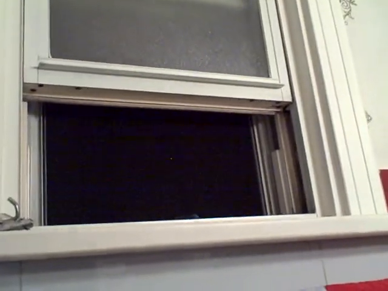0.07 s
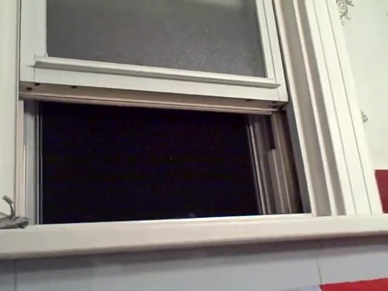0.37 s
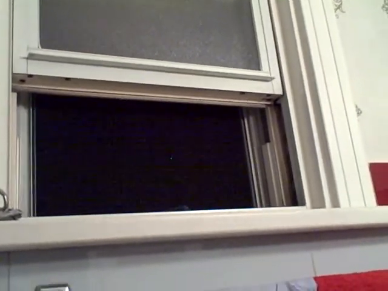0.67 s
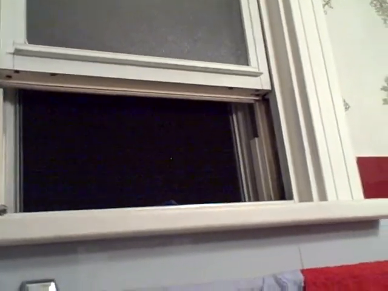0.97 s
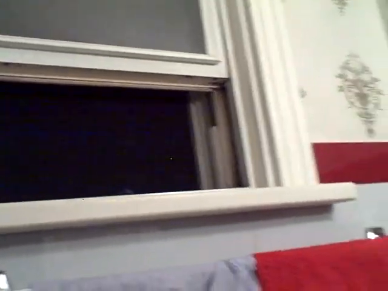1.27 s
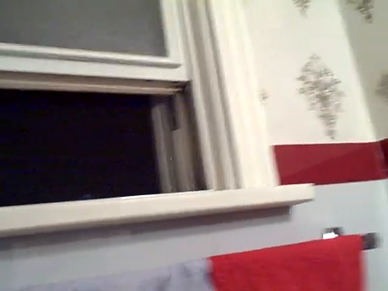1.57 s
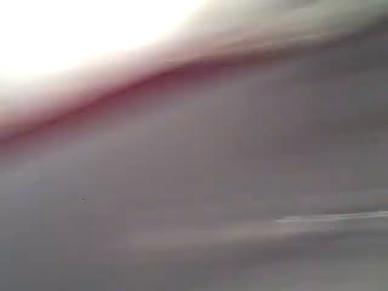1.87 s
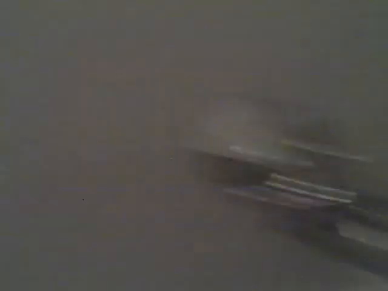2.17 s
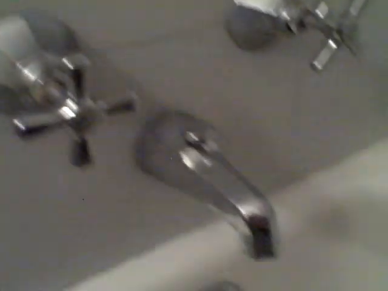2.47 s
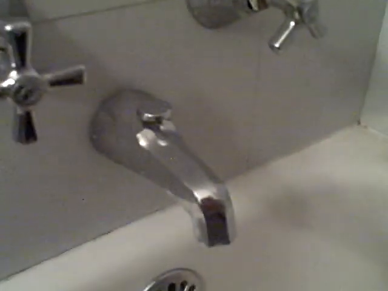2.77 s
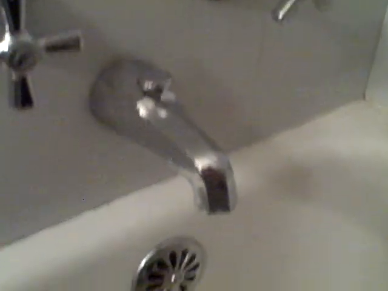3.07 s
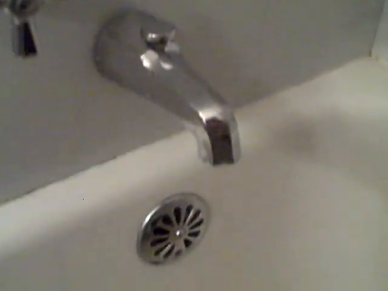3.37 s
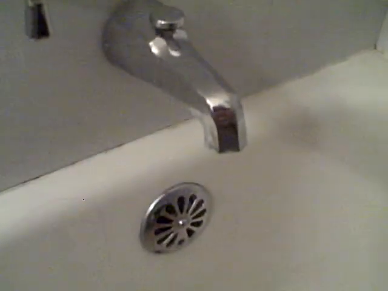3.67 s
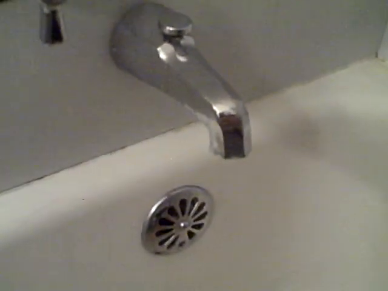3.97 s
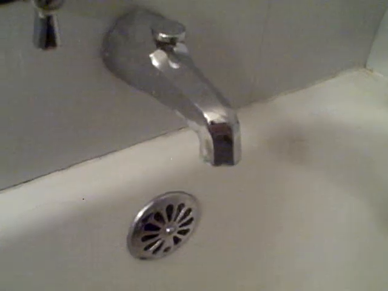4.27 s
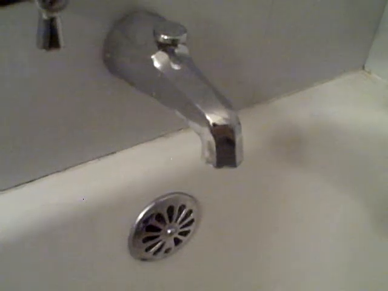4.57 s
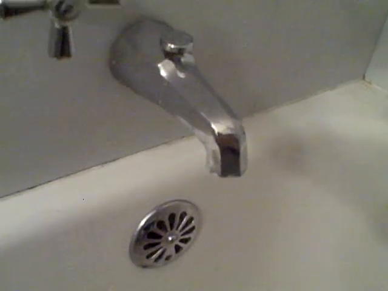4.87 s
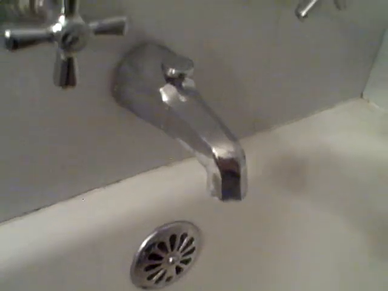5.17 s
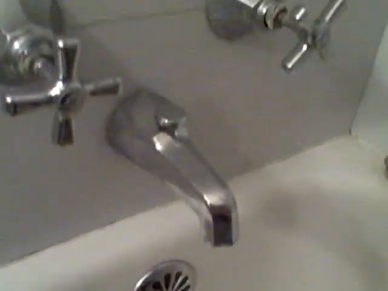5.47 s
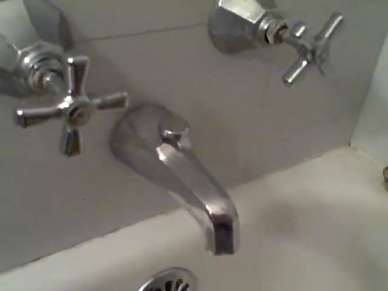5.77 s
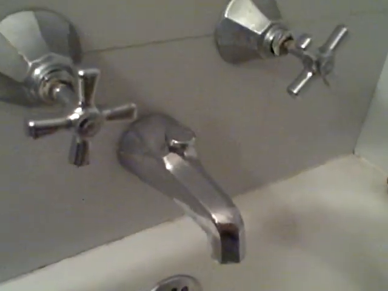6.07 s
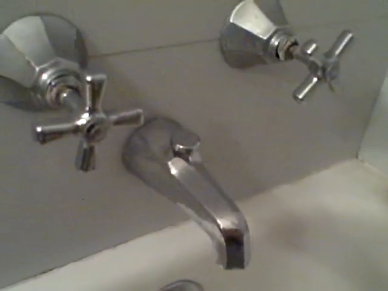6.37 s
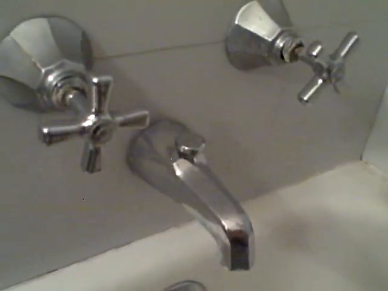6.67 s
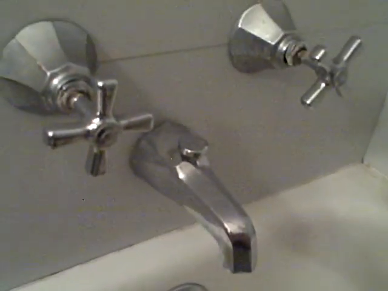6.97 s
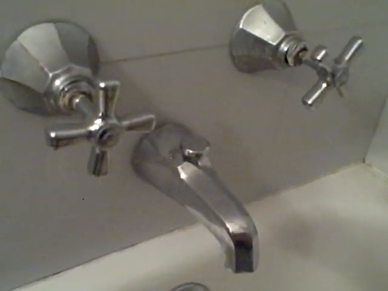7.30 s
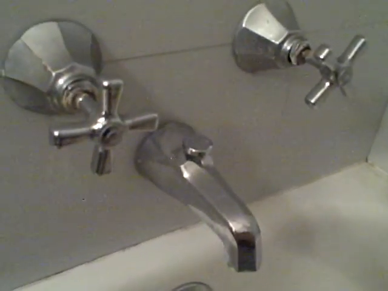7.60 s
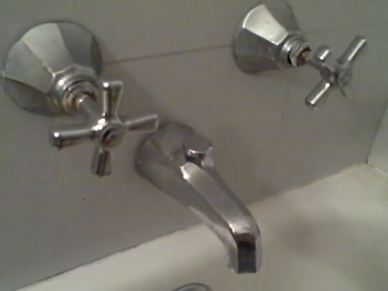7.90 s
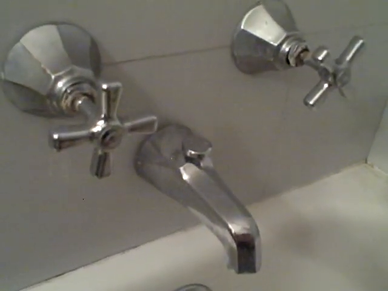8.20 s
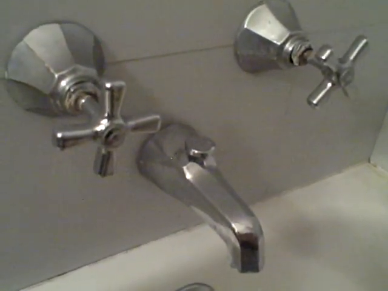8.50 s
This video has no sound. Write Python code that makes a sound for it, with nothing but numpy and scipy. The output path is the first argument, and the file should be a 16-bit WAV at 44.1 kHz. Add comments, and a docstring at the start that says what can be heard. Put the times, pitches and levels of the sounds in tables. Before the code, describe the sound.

Air rushes steadily through a bathtub faucet in a tiled bathroom, making a sputtering hiss, high breathy whistles and a hollow roar in the pipes. About two seconds in, the microphone swings from the window toward the tub with a brief low rumble and two soft swishes. The rush then sounds closer and fuller, with a fine crackle of spray and a few tiny spitting drops.

```python
"""Air rushing through a bathtub faucet

In a tiled bathroom, air in the pipes makes a hollow roar, a hiss and breathy whistles at the valve.
Leftover water makes the stream sputter, and now and then a drop spits. We listen through a small
camera that starts at the window, swings round with a buffet on its microphone and stays by the spout."""
import sys
import numpy as np
from scipy import signal
from scipy.fft import rfft, irfft, next_fast_len
from scipy.io import wavfile
from scipy.ndimage import map_coordinates

SR = 44100
rng = np.random.default_rng(int(sys.argv[2]) if len(sys.argv) > 2 else 0)


def to_wav(sig):
    """Store sig (one row per channel, or 1-D mono) as 16-bit WAV at the path in sys.argv[1].

    Samples outside -1..1 are clipped; the rate is SR.
    """
    pcm = np.clip(np.atleast_2d(sig), -1, 1) * 32767
    pcm = np.round(pcm).astype(np.int16)
    wavfile.write(sys.argv[1], SR, pcm.T)  # frames by channels


N = 376613


# notes of the air in the pipe: (pitch [Hz], width [Hz], window level [dB], tub level [dB])
PIPE_NOTES = [(914, 29, -69.5, -75.5), (972, 20, -72, -67), (1019.5, 22, -71.5, -71),
              (1108, 64, -79.5, -74), (1254, 30, -72.5, -71.5), (1303, 29, -72, -69),
              (1365, 31, -75, -72.5), (1486, 130, -79.5, -72), (1602, 37, -68, -58.5),
              (1642, 34, -66, -58.5), (1694, 73, -86, -60), (1770, 75, -79.5, -66), (1811, 31, -73, -61),
              (2483, 74, -91.5, -76), (2578, 62, -80.5, -76.5), (3840, 60, -78.5, -75.5),
              (4090, 24, -78.5, -75)]

def pipe_roar(sputter, flutter_db=1.0):
    """Rushing air keeps the pipe and spout ringing: a hollow, fluttering roar."""
    *_, roar_db, _ = balance()
    return ringing(PIPE_NOTES) * amp(roar_db + 0.29 * sputter + flutter_db * wobble(14))


# three groups of whistles: (pitch [Hz], width [Hz], level within the group [dB])
LOW_NOTES = [(4834, 26, -1.5), (5180, 70, 0), (5225, 44, -3), (5275, 44, -4), (5400, 90, -5),
             (5690, 46, 1.5), (5745, 54, -.5)]
MAIN_NOTES = [(6230, 110, -16), (6438, 42, -12), (6620, 66, -6), (6696, 36, 1.7), (6758, 58, -4)]
HIGH_NOTES = [(7060, 100, -5), (7205, 66, 0), (7290, 70, -2), (7424, 66, 1), (8572, 62, -17),
              (8780, 110, -25)]
# moments when the main whistle catches and swells: (time [s], half length [s], rise [dB])
WHISTLE_SWELLS = [(1.4, .14, 5), (3.58, .14, 5), (3.89, .06, 5), (4.08, .15, 3.5), (6.68, .07, 1),
                  (7.18, .07, 3), (7.78, .12, 1.5)]

def valve_whistles(sputter):
    """Air whistles at the valve; the low group is shielded until the camera faces the spout."""
    t = np.arange(N) / SR
    low_db, main_db, high_db, *_ = balance()
    swell_db = sum(db * np.exp(-((t - s) / half) ** 2) for s, half, db in WHISTLE_SWELLS)
    shielded_db = -5 * (1 - nearness())
    low = whistle(LOW_NOTES, low_db + shielded_db + 0.96, flutter_db=-0.05, waver_cents=1.19)
    main = whistle(MAIN_NOTES, main_db + swell_db + 2.3, flutter_db=1.0, waver_cents=1.3)
    high = whistle(HIGH_NOTES, high_db + 0.17, flutter_db=0.2, waver_cents=1.3)
    return (low + main + high) * amp(.5 * sputter)


def whistle(notes, level_db, flutter_db, waver_cents, drift_db=0.62, sag_cents_per_s=.9, in_tune_s=5):
    """One group of breathy notes that waver, flutter and sag in pitch as the pressure eases."""
    tone = unit(noise(peaks(notes)))
    cents = sag_cents_per_s * (in_tune_s - np.arange(N) / SR) + waver_cents * wobble(5)
    speed = 2 ** (cents / 1200)  # 1200 cents make an octave
    tone = map_coordinates(tone, [np.cumsum(speed)], order=3, mode="mirror")
    return tone * amp(level_db + drift_db * wobble(7) + flutter_db * wobble(30))


# tone of the hiss from two places: (frequency [Hz], level [dB])
HISS_AT_WINDOW = [(20, -62.5), (50, -77.5), (110, -84.5), (300, -75.5), (560, -86.5), (790, -84),
                  (1200, -80.5), (2100, -86), (3100, -85), (4400, -75), (6600, -75.5), (7400, -80),
                  (8100, -95), (9000, -102)]
HISS_AT_TUB = [(20, -63), (45, -78.5), (190, -77), (400, -77), (790, -81), (1200, -79), (2100, -82),
               (3500, -80), (4600, -77), (6300, -73.5), (7500, -80.5), (8000, -86.5), (8350, -90),
               (8900, -102.5)]

def jet_hiss(sputter):
    """The jet of air makes a broad hiss that sputters with the stream."""
    return window_to_tub(slope(HISS_AT_WINDOW), slope(HISS_AT_TUB)) * amp(.7 * sputter)


# low notes of the room and tub: (pitch [Hz], width [Hz], window level [dB], tub level [dB])
ROOM_NOTES = [(78.6, 9.7, -70, -62), (91, 12, -78, -70), (132, 30, -83, -71.5), (154.3, 15, -72.5, -73.5),
              (239.8, 14, -79, -67), (268, 7.1, -69.5, -67), (327, 17, -87, -69), (447.2, 12, -75, -63),
              (436, 24, -86, -69), (504, 21, -64.5, -65), (505, 14, -72.5, -64), (541, 17.4, -61, -59),
              (577.6, 13.8, -66.5, -61), (622, 17, -73.5, -68), (638, 18, -79.5, -74.5),
              (700, 40, -76.5, -75.5)]

def room_boom():
    """Sound bouncing to and fro in the room and the tub builds into a low boom."""
    *_, boom_db = balance()
    return amp(boom_db) * ringing(ROOM_NOTES)


# drops spitting in the spout: (time [s], level [dB])
DROPS = [(3.229, -30), (3.611, -32), (4.2483, -28.5), (5.138, -30), (5.392, -33), (7.195, -29.5),
         (7.555, -26)]

def spitting_drops(fade_s=0.011):
    """Each drop bursts in the stream with a tiny bright tick."""
    t = np.arange(N) / SR
    bursts = sum(amp(db - 60 * np.abs(t - s) / fade_s) * (t >= s) for s, db in DROPS)
    bright = slope([(500, -17), (2500, -2.0), (4000, 0), (7300, 1.5), (8200, -13), (9500, -25.0)])
    return bursts * unit(noise(bright))


def spray(drops_per_s=260, level_db=-49):
    """Tiny droplets torn off by the jet make a fine crackle, heard only near the spout."""
    drops = (rng.random(N) < drops_per_s / SR) * rng.exponential(1, N)
    bright = slope([(600, -21), (2200, -1), (4000, -2.5), (7000, 4.0), (8200, -2.5), (9000, -26)])
    return unit(filtered(drops, bright)) * amp(level_db) * nearness()


# tone of the air pushing on the microphone: (frequency [Hz], relative level [dB])
BUFFET_TONE = [(8, -1), (20, 10), (40, 1.5), (75, -5), (130, -20.5), (250, -40), (600, -58), (2000, -91)]
# swishes of the swing: (time [s], half length [s], level [dB], centre [Hz], width [Hz])
SWISHES = [(1.905, 0.074, -40.5, 5000, 1700), (2.252, .025, -35.5, 3180, 4000)]

def camera_swing(start_s=1.68, fade_in_s=.06, peak_s=1.963, peak_db=-26, flap_db=-6):
    """The swing buffets the microphone: a rumble, a higher flap at its peak and two soft swishes."""
    t = np.arange(N) / SR
    below_peak_db = np.maximum(41 * (peak_s - t), 57 * (t - peak_s))  # rise and fall in dB a second
    push = amp(peak_db - below_peak_db) * np.clip((t - start_s) / fade_in_s, 0, 1)
    buffet = push * unit(noise(slope(BUFFET_TONE)))
    flap = amp(flap_db) * push ** 2 / push.max() * unit(noise(peaks([(70, 59, 0)])))
    swishes = np.zeros(N)
    for s, half, db, hz, width in SWISHES:
        swell = amp(db) * np.exp(-((t - s) / half) ** 2)
        swishes += swell * unit(noise(peaks([(hz, width, 0)])))
    return buffet + flap + swishes


def tile_echoes(x, echo_db, near_change_db, fade_s=.24, above_hz=1700):
    """Tiles echo the treble; the pattern shifts as the camera moves, and weakens near the spout."""
    # 4.5 new echo patterns on the way to the tub, and .55 a second as the hand drifts
    travel = 4.5 * nearness() + .55 * np.arange(N) / SR
    t = np.arange(SR // 4) / SR
    echoes = np.zeros(N)
    for step in range(int(travel.max()) + 2):
        tail = rng.standard_normal(len(t)) * amp(-60 * t / fade_s)
        presence = np.cos(np.pi / 2 * np.minimum(np.abs(travel - step), 1))
        echoes += presence * signal.oaconvolve(x, tail / np.linalg.norm(tail))[:N]
    echoes = filtered(echoes, lambda hz: hz ** 2 / (hz ** 2 + above_hz ** 2))
    share = amp(echo_db + near_change_db * nearness())
    return (x + share * echoes) / np.sqrt(1 + share ** 2)


# relative levels at the window, beside the handle, low over the spout and up by both handles:
# (arrives [s], leaves [s], low whistle [dB], main whistle [dB], high whistle [dB], roar [dB], boom [dB])
RESTING_PLACES = [(0, 2, -46, -44.5, -47.5, -.5, .5), (2.25, 3.05, -34, -36.8, -39, 0.7, -0.2),
                  (3.35, 5.14, -37.5, -36.5, -37, 1, 0.36), (5.35, 8.54, -37.5, -37.5, -41, 0.2, -.2)]

def balance():
    """Sound spreads unevenly, so the five levels glide to a new mix at each place the camera rests."""
    return curves([(s, *levels) for arrives, leaves, *levels in RESTING_PLACES for s in (arrives, leaves)])


# the camera's path: (time [s], nearness to the tub [0-1])
CAMERA_PATH = [(1.2, 0), (2.03, 0.12), (2.25, 0.51), (2.9, 0.83), (3.3, 1), (8.54, 0.83)]

def nearness():
    """How far the camera has come: 0 at the window, 1 at the tub."""
    return curves(CAMERA_PATH)[0]


def window_to_tub(at_window, at_tub):
    """Noise whose tone passes from the window's to the tub's as the camera comes near."""
    near = nearness()
    return np.sqrt(1 - near) * noise(at_window) + np.sqrt(near) * noise(at_tub)


def ringing(notes):
    """The air stream keeps a set of notes ringing."""
    at_window = peaks([(hz, width, db) for hz, width, db, _ in notes])
    at_tub = peaks([(hz, width, db) for hz, width, _, db in notes])
    return window_to_tub(at_window, at_tub)


def noise(shape):
    """Swirling air: white noise with a power of 1 per Hz, put through a tone shape."""
    return filtered(rng.standard_normal(N) * np.sqrt(SR / 2), shape)


def filtered(x, shape):
    """Turn each frequency of x up or down by a tone shape."""
    size = next_fast_len(N + SR // 2)
    return irfft(rfft(x, size) * shape(np.fft.rfftfreq(size, 1 / SR)), size)[:N]


def slope(points):
    """A tone shape that joins (frequency [Hz], level [dB]) points."""
    freqs, db = np.transpose(points)
    return lambda hz: amp(np.interp(np.log(hz + 1), np.log(freqs), db))


def peaks(notes):
    """A tone shape with a steep peak at each (pitch [Hz], width [Hz], level [dB])."""
    return lambda hz: np.sqrt(sum(amp(db) ** 2 / (1 + ((hz - pitch) / (0.68 * width)) ** 2) ** 2
                                  for pitch, width, db in notes))


def curves(rows):
    """Join the rows over time: one curve for each column after the first."""
    times, *columns = np.transpose(rows)
    return [np.interp(np.arange(N) / SR, times, column) for column in columns]


def wobble(rate):
    """A smooth curve through `rate` random points a second."""
    return map_coordinates(rng.standard_normal(int(N * rate / SR) + 4), [np.arange(N) * rate / SR])


def amp(db):
    """Turn decibels into a volume factor."""
    return 10 ** (np.asarray(db) / 20)


def unit(x):
    """Scale to an average strength (rms) of 1."""
    return x / np.sqrt(np.mean(x ** 2) + 1e-20)


def scene():
    """Mix it all; water left in the pipe makes the hiss, roar and whistles sputter together."""
    sputter = 0.3 * wobble(9) + 1.1 * wobble(45) + 0.99 * wobble(170)
    rush = jet_hiss(sputter) + pipe_roar(sputter) + room_boom()
    rush = tile_echoes(rush, echo_db=-5.0, near_change_db=-4.5)
    whistles = tile_echoes(valve_whistles(sputter), echo_db=-7.0, near_change_db=-12.0)
    return (rush + whistles + spray() + spitting_drops() + camera_swing())[None]


def record(dry):
    """The camera cuts off the highest treble."""
    top_hz = 9000
    return np.array([filtered(x, lambda hz: 1 / np.sqrt(1 + np.minimum(hz / top_hz, 2) ** 240))
                     for x in dry])


dry = scene()
out = record(dry)
to_wav(out)
```